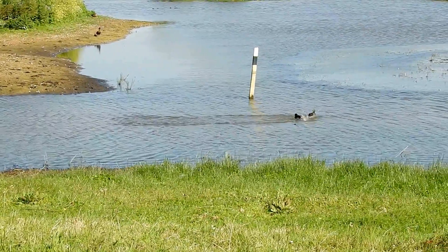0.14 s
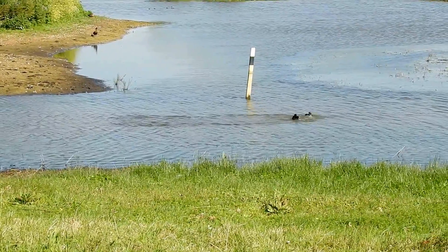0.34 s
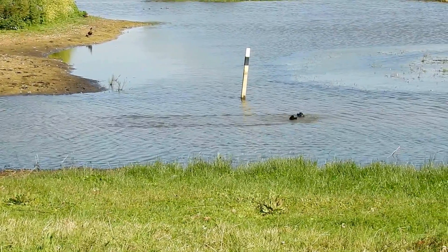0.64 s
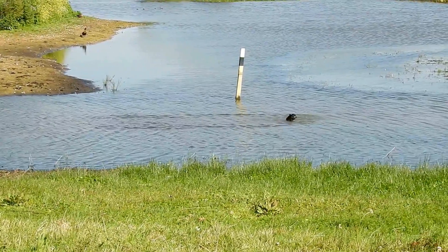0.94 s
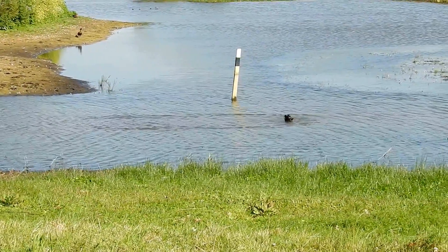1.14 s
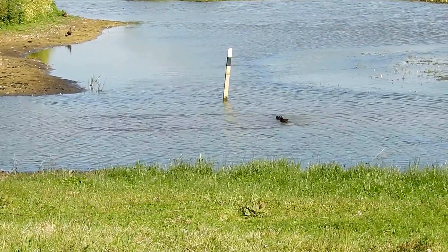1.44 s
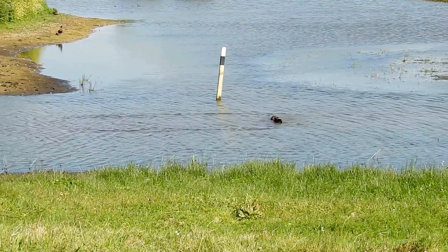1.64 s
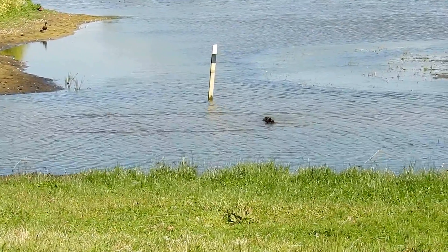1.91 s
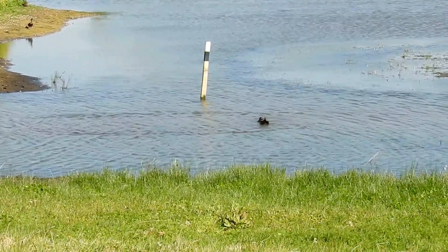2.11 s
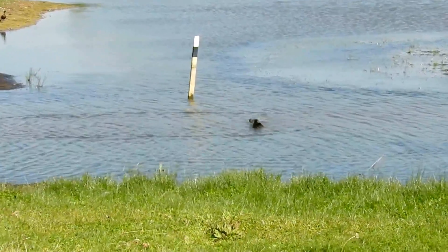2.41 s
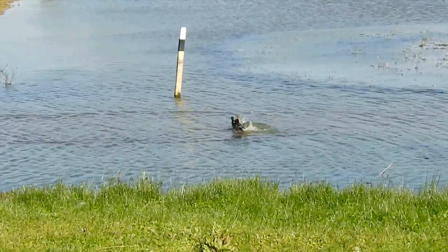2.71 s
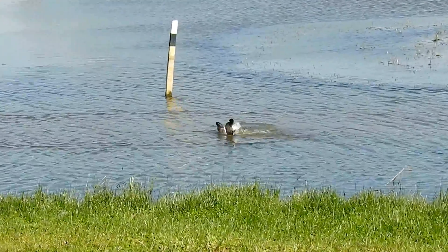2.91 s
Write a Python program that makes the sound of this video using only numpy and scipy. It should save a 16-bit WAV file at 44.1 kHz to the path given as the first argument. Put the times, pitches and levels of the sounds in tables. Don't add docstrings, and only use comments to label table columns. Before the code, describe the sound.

Outdoors at a windy pond, water splashing fades quickly, a small yelp and thin high twitters follow, then camera taps, motor whirr and a heavy knock precede renewed thrashing, under close low microphone wind rumble.

```python
import sys
import numpy as np
from scipy import signal
from scipy.fft import rfft, irfft
from scipy.io import wavfile
from scipy.ndimage import uniform_filter1d

SR = 44100
rng = np.random.default_rng(int(sys.argv[2]) if len(sys.argv) > 2 else 0)


def digitize_waveform(pressure):
    field = np.atleast_2d(pressure).T
    bounded = np.clip(field, -1, 1)
    quanta = np.round(bounded * 32767).astype(np.int16)
    wavfile.write(sys.argv[1], SR, quanta)


def field_ratio(decibels):
    return 10 ** (np.asarray(decibels, dtype=float) / 20)


N = 134946

# time in seconds, level in dB.
GUST = [(0, -33), (.1, -35), (.33, -41), (.57, -39.5), (.74, -32), (.92, -40.5), (1.06, -39.5), (1.18, -38),
        (1.23, -28), (1.4, -35.5), (1.53, -38), (1.87, -38.5), (1.97, -32.5), (2.12, -39.5), (2.6, -38.5),
        (2.76, -41), (2.93, -32.5), (3.06, -37.5)]
# time in seconds, gain in dB.
PORT_SWING = [(0, 11), (.13, 2.5), (.36, -2), (.6, -7), (.75, 5), (1.0, 9), (1.27, 8.5), (1.5, 1),
              (1.7, -0.5), (1.87, 0.5), (2.0, 6.5), (2.14, 3), (2.35, 2.5), (2.58, -5), (2.77, 2),
              (2.88, 2), (2.98, -3), (3.06, 3)]
# pitch in Hz, width in Hz, level in dB, share of gust followed (0 = follows
CAVITY_MODES = [(203.3, 14.7, -0.5, 0.95, 0.81), (183, 23.7, -1.5, 1, 0.57), (273.8, 32, -17.5, 0, 0.49),
                (314.8, 24, -19.5, 0, 0.32), (66.5, 25.7, -12.5, 0.43, 0.32), (128.5, 57, -9, 0.72, 0.22)]
PORT_DIFFERENCE_DB_AT_60_HZ = 0.9
# frequency in Hz, level in dB per Hz.
RUMBLE_SPECTRUM = [(22, -46), (40, 2), (60, -25), (150, -11), (300, -12), (380, -21), (700, -15),
                   (1200, -44)]
RUMBLE_DB, RUMBLE_GUST_SHARE = -33.5, 1
# frequency in Hz, level in dB per Hz.
HISS_SPECTRUM = [(350, -1.5), (800, -1), (1600, -6), (3900, -8.5), (4500, -5), (6500, -1), (8200, -14.5),
                 (15700, -28)]
HISS_DB, HISS_GUST_SHARE = -51.5, 0.019
# frequency in Hz, likeness 0-1.
LIKENESS = [(60, 0.95), (200, 1), (700, 0.71), (2500, 0.56), (5000, 0.24), (9000, 0)]

# time in seconds, level in dB.
THRASH_BOUTS = [
    [(0, -43.5), (.06, -50.5), (.095, -50.5), (.19, -51), (.29, -50), (.37, -63)],
    [(2.56, -55), (2.61, -48), (2.72, -47), (2.85, -48), (2.95, -49.5), (3.06, -49)],
]
# frequency in Hz, level in dB per Hz.
SPLASH_SPECTRUM = [(300, -0.5), (500, -5), (900, -3), (1600, -4.5), (2800, -7.5), (3900, -11), (5200, -6),
                   (9000, -28.5)]
DROPS_PER_S, DROP_LOW_HZ, DROP_HIGH_HZ, DROP_T60_CYCLES = 2400, 550, 6500, 45
DROP_CUT_HZ, SPRAY_DB, SPRAY_PATCHY_DB = 20000, -2, 2.5
# start in seconds, peak in dB, pitch in Hz.
PLOPS = [(0.019, -40, 1090), (.074, -39, 1090), (.083, -40, 930), (.09, -39, 1050), (.097, -33, 1034),
         (.11, -36, 840), (.163, -41, 4900), (.179, -40, 4930), (0.242, -41.5, 1050), (.268, -40, 1610),
         (.282, -45, 5050), (.012, -38, 2960), (0.076, -35, 820), (0.099, -36.5, 800), (0.119, -37, 1480),
         (0.134, -36, 1290), (0.15, -39, 1500), (0.182, -44, 1310), (0.229, -43, 910), (0.297, -35, 1560),
         (2.593, -38, 2300), (2.607, -36, 1250), (2.637, -35, 1020), (2.672, -31, 1306), (2.704, -33, 3150),
         (2.717, -33.5, 2430), (2.72, -40, 936), (2.728, -33, 1000), (2.746, -33.5, 3020),
         (2.766, -42, 1160), (2.804, -35.5, 1420), (2.807, -46, 945), (2.821, -36, 790), (2.858, -38, 1000),
         (2.885, -38, 890)]
PLOP_T60_S_AT_1_KHZ = 0.037
# start in seconds, peak in dB, pitch in Hz.
SLAPS = [(0.0177, -35, 4540), (0.0438, -34, 4060), (0.1, -42, 4100), (0.2343, -44, 5740),
         (0.293, -37, 4230), (2.5636, -34, 5600), (2.679, -38, 4500), (2.724, -32.5, 4400),
         (2.7538, -31, 4900), (2.8, -24.5, 5100), (2.826, -32, 5700), (2.844, -34.5, 3940),
         (2.94, -35, 6400), (2.9532, -30, 5300), (3.0356, -22.5, 5060)]
SLAP_T60_S, SLAP_AIR_DB, SLAP_WIDTH_HZ = 0.013, -29, 1960

YELP_S, YELP_LENGTH_S, YELP_FROM_HZ, YELP_TO_HZ, YELP_TILT_DB = .44, .056, 2160, 1830, 12
# multiple of the pitch, level in dB.
YELP_PARTIALS = [(1, -48.5), (2, -48.5), (3, -72)]
# start in seconds, length in seconds, pitch in Hz, level in dB.
YELP_TAIL = [
    (.474, .026, 2030, -50),
    (.493, .01, 1620, -54),
    (.5, .016, 1870, -57),
    (.516, .01, 2020, -59),
    (.536, .012, 1950, -59),
    (.552, .014, 1850, -62),
]
# start in seconds, length in seconds, from pitch in Hz, to pitch in Hz, level in dB.
SONG_NOTES = [(1.007, 0.0091, 4800, 4200, -46), (1.174, 0.0074, 4760, 4300, -48),
              (1.418, 0.0076, 5900, 4900, -46), (1.495, 0.015, 6500, 4410, -46.5),
              (1.576, 0.0061, 6450, 5800, -43.5), (1.583, 0.01, 5450, 4700, -48),
              (1.683, 0.004, 6950, 5960, -41.5), (1.685, 0.0032, 5500, 4800, -45),
              (1.732, 0.023, 5140, 5800, -55.5), (1.882, .004, 6930, 5870, -46),
              (1.887, 0.0037, 5500, 4900, -48), (1.86, .01, 4600, 5070, -52),
              (1.928, 0.016, 3850, 4170, -56), (1.942, 0.018, 4100, 4280, -48),
              (1.962, 0.0089, 3980, 3600, -48.5), (1.973, .008, 3860, 3500, -49),
              (1.98, .012, 3850, 3600, -56), (1.994, .014, 3850, 3600, -57), (2.04, .024, 5060, 5140, -53),
              (2.058, .034, 5130, 5190, -46), (2.236, 0.0087, 7750, 6500, -42.5),
              (2.272, 0.0134, 7270, 5900, -43.5), (2.313, 0.0147, 7250, 6000, -49),
              (2.359, 0.016, 7070, 5800, -51)]
# start in seconds, end in seconds, spacing in seconds, pitch in Hz, level in dB.
SONG_TRILLS = [
    (1.604, 1.67, .0152, 6500, -45),
    (1.705, 1.825, .0128, 4320, -55.5),
    (1.78, 1.84, .0128, 3680, -61),
]
PIP_LENGTH_S, PIP_RISE_SHARE = .008, .05
SONG_LAG_RAD, SONG_PAN_DB = 1, 1.5
FLUTTER_DB, FLUTTER_PER_S = 2, 300
SCATTER_DB, SCATTER_T60_S = -9, .4

# start in seconds, level in dB, T60 in seconds.
RUBS = [
    (1.192, -53, 0.23),
    (1.222, -69, 0.37),
    (1.955, -61, 0.22),
    (2.404, -45.5, 0.21),
    (2.46, -53.5, .3),
    (2.485, -51.5, .2),
]
THUMP_S, HOLLOW_HZ, HOLLOW_WIDTH_HZ, HOLLOW_DB, HOLLOW_T60_S = 2.404, 345, 260, -39.5, .35
# time in seconds, level in dB.
MOTOR_EFFORT = [(1.9, -62), (1.965, -43.5), (2.0, -45), (2.215, -46.5), (2.24, -85), (2.42, -49),
                (2.48, -47), (2.6, -44), (3.06, -44.5)]
# pitch in Hz, width in Hz, level in dB, left-right likeness -1 to 1.
BODY_MODES = [(1100, 51, -5, 0.97), (1255, 46, -18, 0.83), (1786, 170, -14.5, 0.64), (2480, 87, -8, 0.62),
              (1000, 250, -6.5, 0.83), (3040, 230, -10, 0.37), (3700, 140, -15, 0.97),
              (4500, 300, -7.5, 0.85), (5740, 840, -0.5, -0.051), (6260, 240, -1.5, -0.31),
              (6550, 140, -4, 0.49), (7190, 190, -3.5, -0.3), (8320, 210, -18, -0.19)]
GEAR_PER_S, GEAR_DEPTH = 140, 0.13
# start in seconds, peak in dB, pitch in Hz, T60 in seconds.
KNOCKS = [
    (1.964, -36, 643, 0.02),
    (2.034, -32, 1000, 0.028),
    (2.252, -33.5, 1110, 0.046),
    (2.253, -40, 794, 0.034),
    (2.4055, -20, 288.3, 0.063),
    (2.406, -42, 480, 0.019),
    (2.432, -32, 450, 0.05),
    (2.405, -45, 1330, 0.055),
]


def amp_of_time(rows):
    return field_ratio(np.interp(np.arange(N) / SR, *np.transpose(rows), left=-120, right=-120))


def rms_one(x):
    return x / np.sqrt(np.mean(x ** 2) + 1e-20)


def at_hz(points, hz):
    points_hz, values = np.array(points).T
    return np.interp(np.log(hz), np.log(points_hz), values)


def drift(rate_hz):
    r = np.exp(-80 * np.pi * rate_hz / SR)
    noise = rng.standard_normal(N // 40 + 2002)
    slow = signal.lfilter([1], [1, -2 * r, r * r], noise)[2000:]
    return np.interp(np.arange(N) / 40, np.arange(len(slow)), rms_one(slow))


def pair(mid, side, alike):
    alike = np.clip(alike, -1, 1)
    return np.sqrt(1 + alike) * mid + np.sqrt(1 - alike) * side * [[1], [-1]]


def resonance(x, hz, width_hz):
    r = np.exp(-np.pi * width_hz / SR)
    poles = [1, -2 * r * np.cos(2 * np.pi * hz / SR), r * r]
    return signal.lfilter([(1 - r * r) / 2, 0, (r * r - 1) / 2], poles, x)


def ring(clicks, hz, t60_s):
    r = field_ratio(-60 / (t60_s * SR))
    w = 2 * np.pi * hz / SR
    return signal.lfilter([0, np.sin(w)], [1, -2 * r * np.cos(w), r * r], clicks + 1e-18)


def coloured(spectrum, patchy_db):
    hz = np.maximum(np.fft.rfftfreq(N, 1 / SR), 10)
    mid, side = rfft(rng.standard_normal((2, N))) * field_ratio(at_hz(spectrum, hz))
    noise = irfft(pair(mid, side, at_hz(LIKENESS, hz)), N)
    return rms_one(noise) * field_ratio(patchy_db * drift(13.0))


def add(out, start_s, sound):
    i = int(start_s * SR)
    out[..., i:i + sound.shape[-1]] += sound[..., :N - i]


def struck(db, hz, t60_s):
    t = np.arange(int(t60_s * SR)) / SR
    onset = 1 - np.exp(-t * hz * 2)
    return field_ratio(db - 60 * t / t60_s) * np.sin(2 * np.pi * hz * t) * onset


def glide(length_s, from_hz, to_hz, lag_rad=0, roundness=0.4):
    u = np.arange(int(length_s * SR)) / (length_s * SR)
    phase = 2 * np.pi * length_s * (from_hz * u + (to_hz - from_hz) * u * u / 2)
    ears_rad = np.array([[lag_rad / 2], [-lag_rad / 2]])
    return np.sqrt(2) * np.sin(np.pi * u) ** roundness * np.sin(phase + ears_rad)


def cavity_boom(mean, swell):
    boom = 0
    for hz, width_hz, db, follows, evenness in CAVITY_MODES:
        noise = rng.standard_normal((2, N))
        mid, side = resonance(resonance(noise, hz, width_hz * 1.26), hz, width_hz * 1.26)
        mid = mid / uniform_filter1d(mid ** 2, size=2600) ** (evenness / 2)
        gain = swell ** follows if follows else amp_of_time(PORT_SWING)
        ports = field_ratio([[PORT_DIFFERENCE_DB_AT_60_HZ * 60 / hz], [0]])
        stereo = pair(rms_one(mid), rms_one(side), at_hz(LIKENESS, hz))
        boom = boom + field_ratio(db - 5.5) * mean * gain * stereo * ports
    return boom


def wind():
    gust = amp_of_time(GUST)
    mean = np.exp(np.mean(np.log(gust)))
    swell = gust / mean
    boom = cavity_boom(mean, swell)
    rumble = mean * field_ratio(RUMBLE_DB) * swell ** RUMBLE_GUST_SHARE * coloured(RUMBLE_SPECTRUM, patchy_db=8.0)
    hiss = field_ratio(HISS_DB) * swell ** HISS_GUST_SHARE * coloured(HISS_SPECTRUM, patchy_db=0.46)
    return boom + rumble + hiss


def thrashing():
    size = field_ratio(1.5 * np.minimum(rng.exponential(1, N), 4)) * rng.choice([-1, 1], N)
    born = rng.random(N) < DROPS_PER_S * field_ratio(2 * drift(20)) / SR
    pitches_hz = np.geomspace(DROP_LOW_HZ, DROP_HIGH_HZ, 24)
    dealt = rng.integers(0, 24, N)
    drops = 0
    for k, hz in enumerate(pitches_hz):
        rings = ring(size * born * (dealt == k), hz, DROP_T60_CYCLES / hz)
        drops = drops + field_ratio(at_hz(SPLASH_SPECTRUM, hz)) * hz / 1000 * rings
    drops = signal.sosfilt(signal.butter(2, DROP_CUT_HZ, fs=SR, output="sos"), drops)
    spray = field_ratio(SPRAY_DB) * coloured(SPLASH_SPECTRUM, patchy_db=SPRAY_PATCHY_DB)
    level = sum(amp_of_time(rows) for rows in THRASH_BOUTS)
    return level * (rms_one(drops) + spray)


def plops():
    out = np.zeros((2, N))
    for start_s, db, hz in PLOPS:
        add(out, start_s, struck(db - 1.5, hz, PLOP_T60_S_AT_1_KHZ * np.sqrt(1000 / hz)))
    return out


def wing_slaps():
    out = np.zeros((2, N))
    i = np.arange(600)
    fade = field_ratio(-60 * i / SR / SLAP_T60_S) * (1 - np.exp(-i / 12))
    for start_s, db, hz in SLAPS:
        noise = rng.standard_normal(600)
        crack = rms_one(resonance(resonance(noise, hz, SLAP_WIDTH_HZ), hz, SLAP_WIDTH_HZ))
        air = field_ratio(SLAP_AIR_DB) * np.diff(noise, prepend=0)
        add(out, start_s, field_ratio(db) * fade * (crack + air))
    return out


def waterbird():
    out = np.zeros((2, N))
    for k, db in YELP_PARTIALS:
        note = glide(YELP_LENGTH_S, k * YELP_FROM_HZ, k * YELP_TO_HZ, lag_rad=0.22, roundness=0.15)
        tilt_db = np.linspace(.5, -.5, note.shape[1]) * YELP_TILT_DB * (k - 1.5)
        add(out, YELP_S, field_ratio(db + tilt_db) * note)
    for start_s, length_s, hz, db in YELP_TAIL:
        add(out, start_s, field_ratio(db) * glide(length_s, hz, hz * .985))
    return out


def songbird():
    out = np.zeros((2, N))
    for start_s, length_s, from_hz, to_hz, db in SONG_NOTES:
        add(out, start_s, field_ratio(db) * glide(length_s, from_hz, to_hz, SONG_LAG_RAD))
    for start_s, end_s, spacing_s, hz, db in SONG_TRILLS:
        pip = glide(PIP_LENGTH_S, hz * (1 - PIP_RISE_SHARE), hz * (1 + PIP_RISE_SHARE), SONG_LAG_RAD)
        for pip_s in np.arange(start_s, end_s, spacing_s):
            uneven_db = rng.normal(0, 1.8)
            add(out, pip_s, field_ratio(db + uneven_db) * pip)
    return out * field_ratio(np.array([[SONG_PAN_DB], [-SONG_PAN_DB]]))


def scatter(calls):
    t = np.arange(SR // 4) / SR
    tail = rng.standard_normal((2, len(t))) * field_ratio(-60 * t / SCATTER_T60_S)
    tail = tail / np.sqrt((tail ** 2).sum() / 2)
    rough = calls * field_ratio(FLUTTER_DB * drift(FLUTTER_PER_S))
    return rough + field_ratio(SCATTER_DB) * signal.fftconvolve(rough, tail, axes=1)[:, :N]


def hand_on_case():
    t = np.arange(N) / SR
    rub = resonance(resonance(rng.standard_normal(N), 600, 1000), 900, 4500)
    rubbing = sum((t > s) * field_ratio(db - 60 * np.abs(t - s) / t60_s) for s, db, t60_s in RUBS)
    noise = rng.standard_normal(N)
    hollow = resonance(resonance(noise, HOLLOW_HZ, HOLLOW_WIDTH_HZ), HOLLOW_HZ, HOLLOW_WIDTH_HZ)
    decay = (t > THUMP_S) * field_ratio(HOLLOW_DB - 60 * np.abs(t - THUMP_S) / HOLLOW_T60_S)
    return rubbing * rms_one(rub) + decay * rms_one(hollow)


def zoom_motor():
    whirr = 0
    for hz, width_hz, db, alike in BODY_MODES:
        noise = rng.standard_normal((2, N))
        mid, side = resonance(resonance(noise, hz, width_hz * 1.8), hz, width_hz * 1.96)
        whirr = whirr + field_ratio(db) * rms_one(pair(mid, side, alike))
    teeth = 1 + GEAR_DEPTH * np.sin(2 * np.pi * GEAR_PER_S * np.arange(N) / SR)
    return amp_of_time(MOTOR_EFFORT) * rms_one(whirr) * teeth


def knocks():
    out = np.zeros((2, N))
    for start_s, db, hz, t60_s in KNOCKS:
        add(out, start_s, struck(db, hz, t60_s))
    return out


def scene():
    water = thrashing() + plops() + wing_slaps()
    calls = scatter(waterbird() + songbird())
    camera = hand_on_case() + zoom_motor() + knocks()
    return wind() + water + calls + camera


def top_cut(x):
    return signal.sosfilt(signal.butter(12, 15740, fs=SR, output="sos"), x)


def record(dry):
    low_pass = signal.ellip(14, .5, 70, 15740, fs=SR, output="sos")
    mix = signal.sosfilt(low_pass, dry)
    return top_cut(mix)


dry = scene()
out = record(dry)
digitize_waveform(out)
```